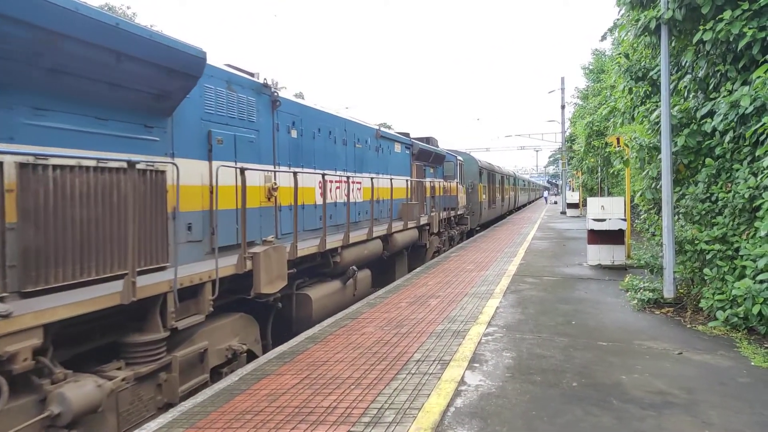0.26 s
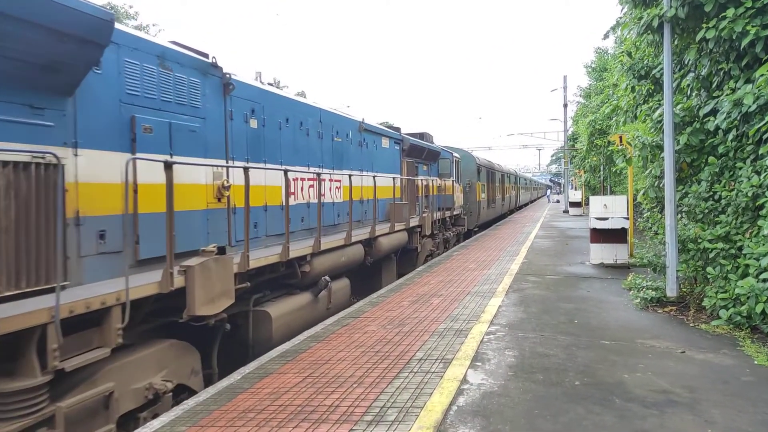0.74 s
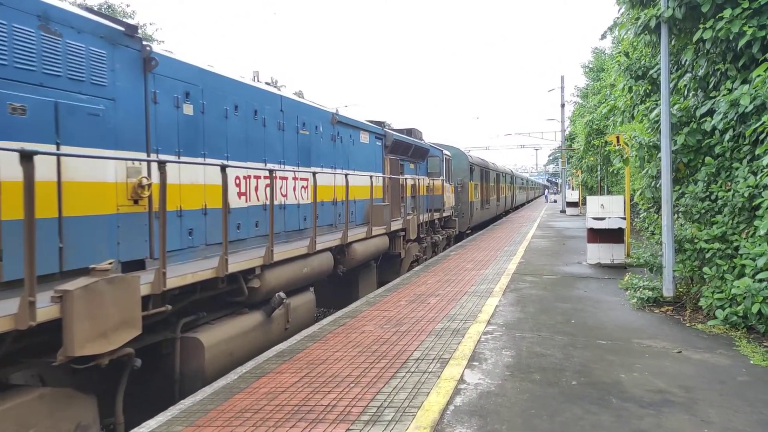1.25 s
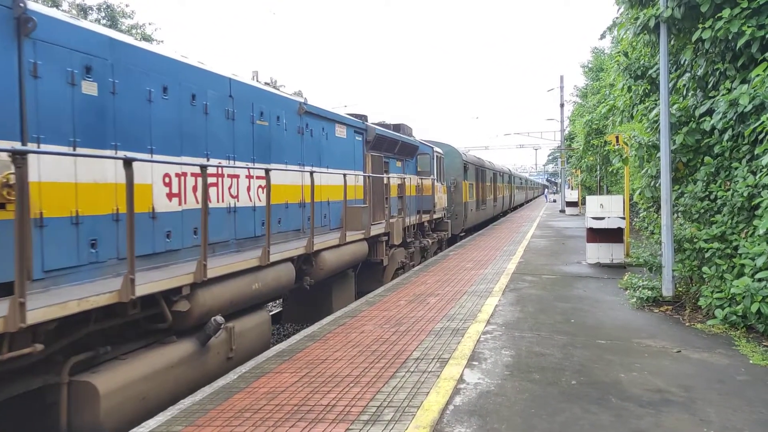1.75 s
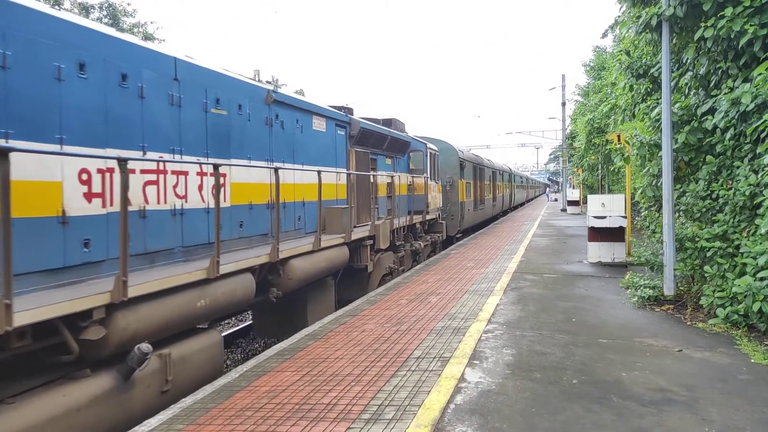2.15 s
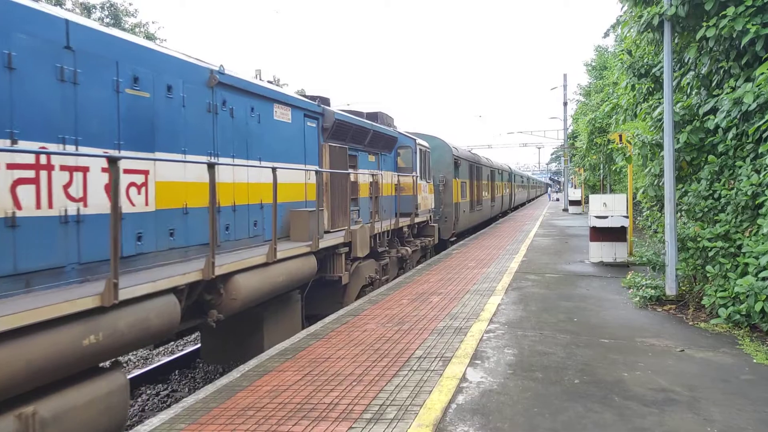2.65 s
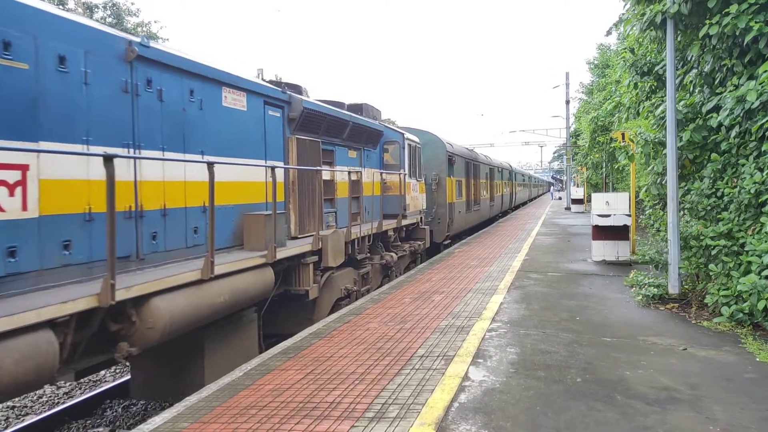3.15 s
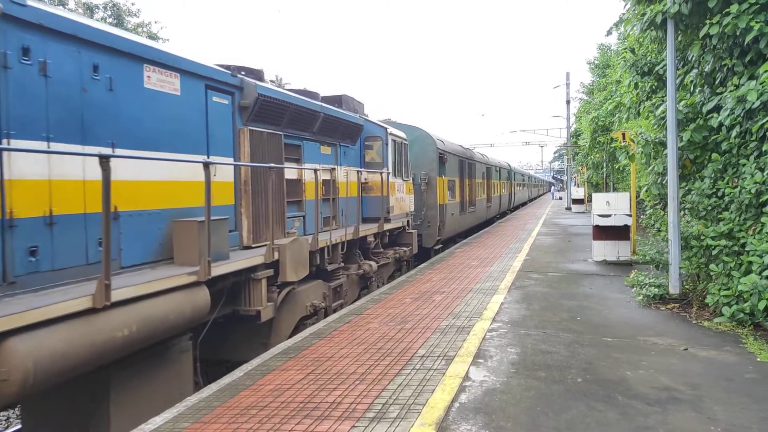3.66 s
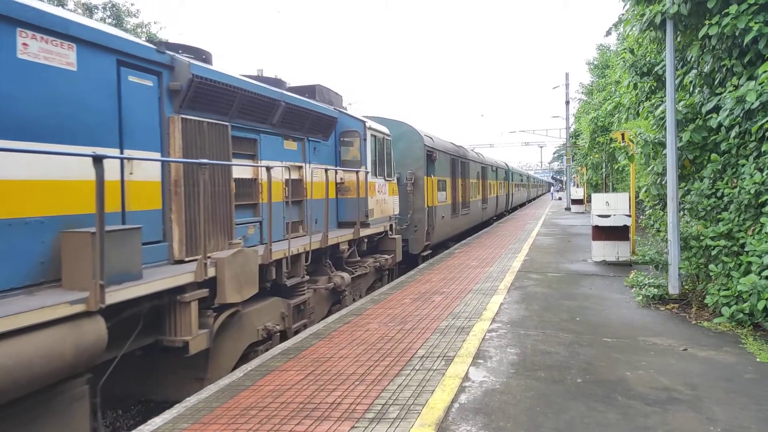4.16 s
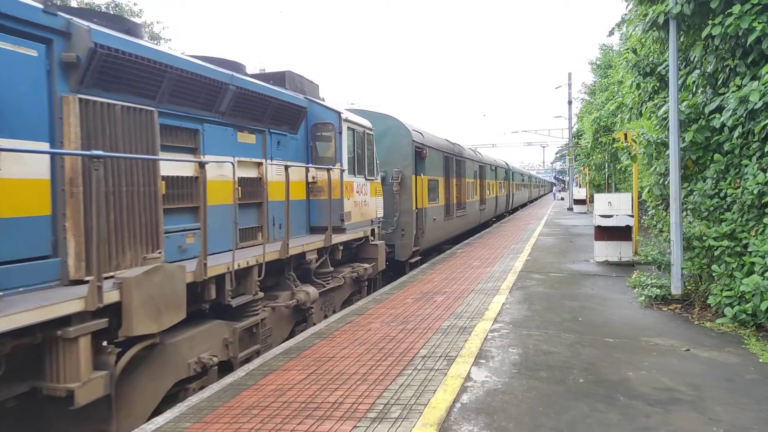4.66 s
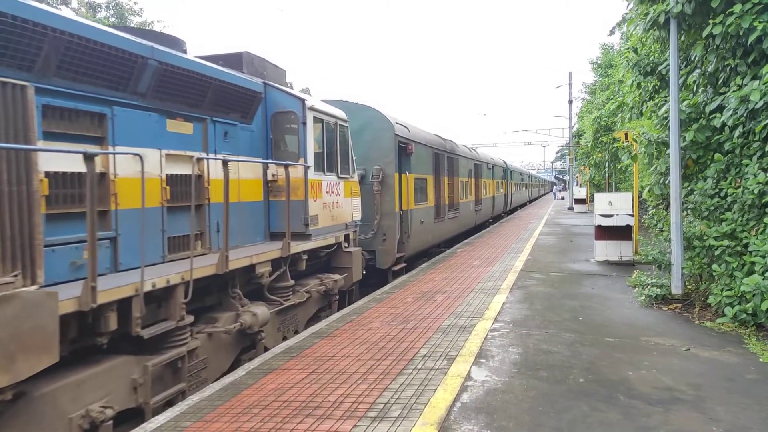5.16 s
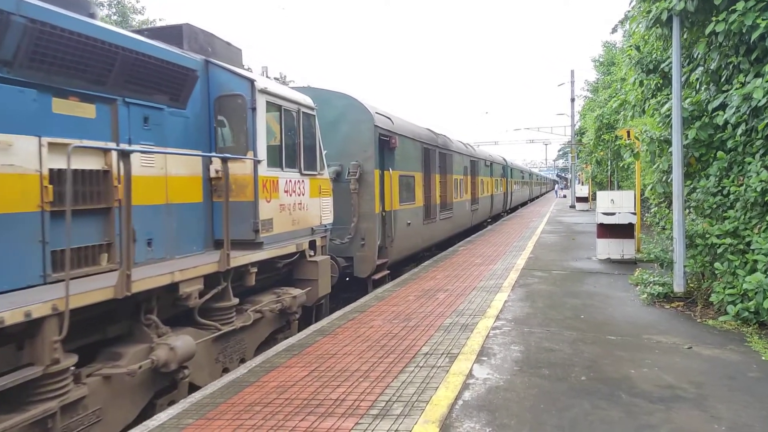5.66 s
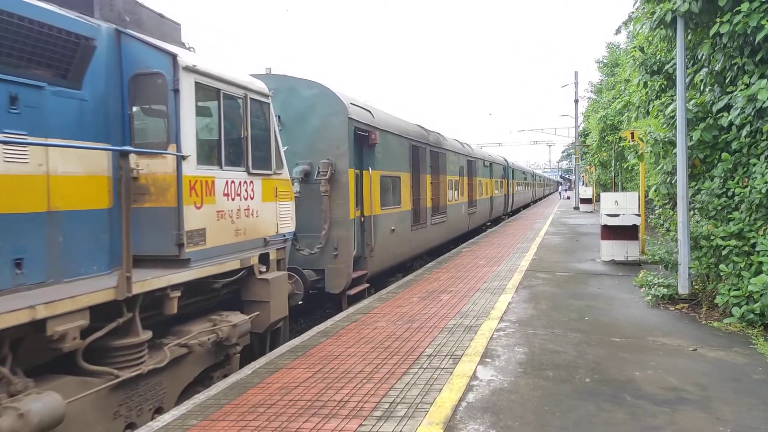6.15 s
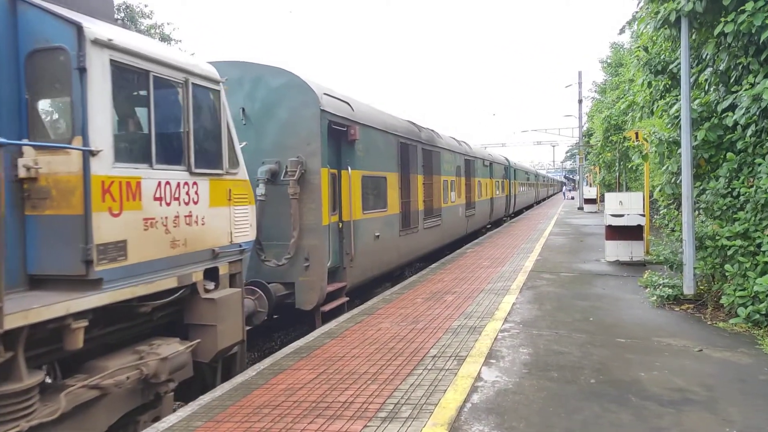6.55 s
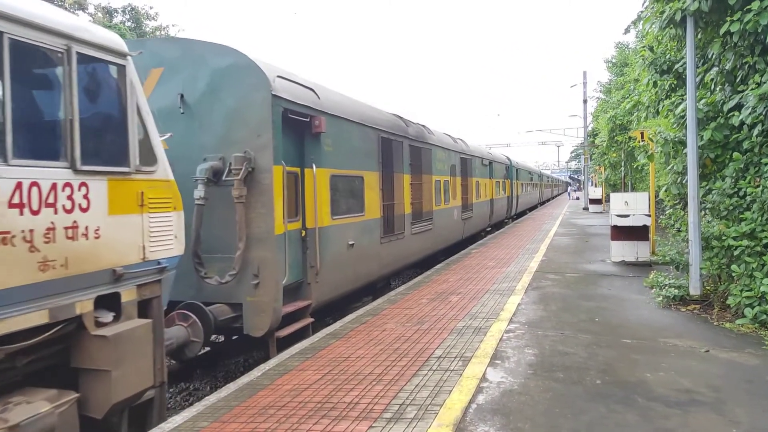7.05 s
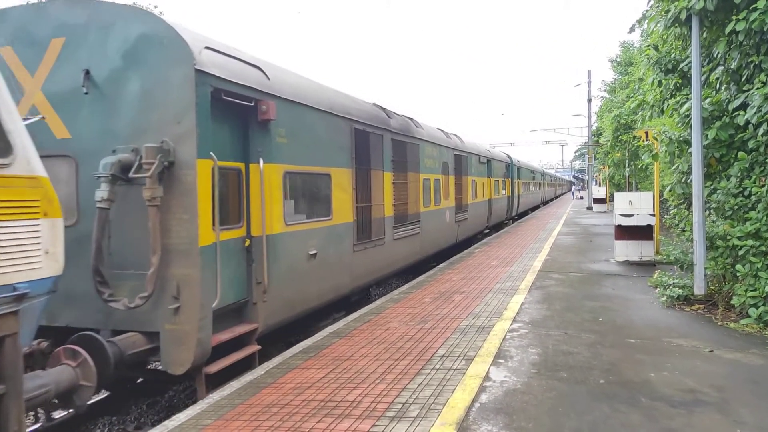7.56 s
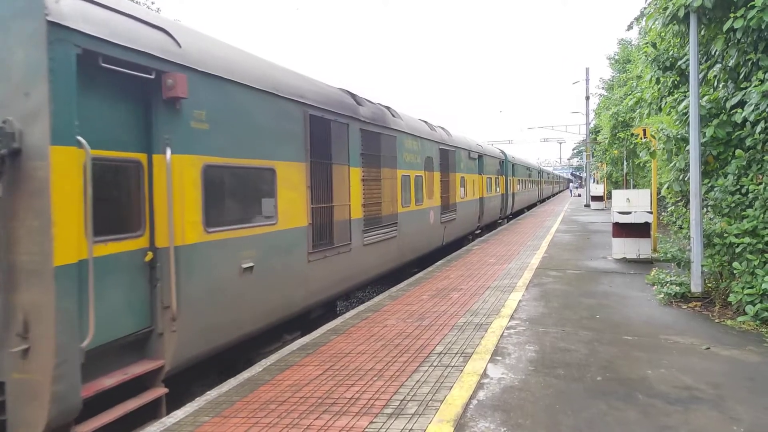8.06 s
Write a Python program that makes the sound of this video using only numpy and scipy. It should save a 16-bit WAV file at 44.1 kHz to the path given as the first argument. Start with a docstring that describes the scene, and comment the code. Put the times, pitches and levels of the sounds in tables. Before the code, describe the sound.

A diesel locomotive rolls slowly past a stereo microphone an arm's length away on an open platform. From 0 to about 1.3 s the engine revs up, its throbbing exhaust drone, gear whine near 4 kHz and airy turbo whistle near 6 to 7 kHz rising together. Then everything glides down, settling near idle by 7 s. Low rumble and a rough mid roar pulse with the firing, swelling around 2 s and again near 6 s; fan noise rushes broadly between. Body panels hum briefly around 1, 2.5 and 4.3 s. Two tiny metallic squeaks come at about 3.6 s, over a faint air sizzle. Intake hiss and whistle flare at 5.3 s. Near 6.2 s the whine bursts out clearer, air spits softly, then the deep boom drops away. Whine flutters throughout and continues to the end at 8.3 s; the left side is duller.

```python
"""Diesel locomotive rolling past a platform

A two-stroke diesel locomotive rolls slowly past, an arm's length from the stereo microphone.
It revs up for about a second, then sinks towards idle; exhaust orders, gear whine and turbocharger whistle
are tones locked to the crankshaft, and gains follow the distance of passing sources.
Running gear, engine roar, fans and intake are shaped noise; body panels drone, metal squeaks and air spits.
The left port lags and is shaded in the treble."""
import sys
import numpy as np
from scipy import signal
from scipy.fft import rfft, irfft, next_fast_len
from scipy.io import wavfile

SR = 44100
rng = np.random.default_rng(int(sys.argv[2]) if len(sys.argv) > 2 else 0)


def dump(signal):
    """Clip the signal to [-1, 1] and save it as 16-bit WAV at the path in sys.argv[1]."""
    limited = np.clip(np.atleast_2d(signal).T, -1, 1)
    pcm = np.round(limited * 32767).astype(np.int16)
    wavfile.write(sys.argv[1], SR, pcm)


N = 366471
TIME = np.arange(N) / SR  # s

# crankshaft speed: t/s, speed/turns per second
CRANK = [(0.0, 6.916), (0.36, 7.363), (1.01, 8.076), (1.3, 8.122), (2.09, 7.867), (2.35, 7.814),
         (3.95, 7.013), (4.41, 6.755), (5.21, 6.486), (6.03, 6.093), (6.52, 5.935), (7.05, 5.84),
         (7.38, 5.8), (8.31, 5.765)]
CRUISE_TURNS_PER_S = 7  # reference for levels that follow the revs
INTAKE_S = 5.3  # the air intake is alongside
# lines of the auxiliary machines, as multiples of the crank rate
FAN_A, FAN_B, PUMP, BLOWER, IDLER_A, IDLER_B = 88, 112, 158, 225, 475, 485


def exhaust(turns):
    """Unequal cylinders put lines on multiples of the crank rate; other crank-locked lines swell among them."""
    uneven = 1 + 0.087 * flutter(width_hz=51).real
    return uneven * (exhaust_boom(turns) + exhaust_drone(turns) + line_blooms(turns))


def crank_line(k, turns):
    """One multiple of the crank rate; its phase drifts."""
    # the two chugs of a turn, which set the phase only: place/turns, weight/dB
    chug_places = [(.76, -2.5), (.15, -1)]
    chugs = sum(undb(db) * np.exp(-2j * np.pi * k * place) for place, db in chug_places)
    drift_cycles = .06 * flutter(width_hz=1.5).real  # shifting paths
    return tone(k * turns + drift_cycles, chugs / np.abs(chugs))


def exhaust_boom(turns):
    """Low exhaust orders recede with distance and are cut off once the cab has come between."""
    # multiple of the crank rate, relative level/dB
    boom_orders = [(8, -2.5), (9, -6.5), (11, -10), (12, -6.5), (13, -8.5), (14, -18.5), (16, -12.5),
                   (17, -10.5)]
    # level/dB before distance and screening, nearest t/s, time to fall 3 dB/s, slope/dB per doubling of revs
    boom_pass = (-24, -8.5, 13.5, 0)
    boom = sum(undb(db) * crank_line(k, turns) for k, db in boom_orders)
    cab_db = -24 * arrival(at_s=6.56, edge_s=1)
    return boom * passing(*boom_pass) * undb(cab_db)


def exhaust_drone(turns):
    """Orders that fall into step once a turn, so the drone lopes; it carries fore and aft, screened by the hood."""
    # multiple of the crank rate, relative level/dB
    drone_orders = [(13, -8), (14, -9), (15, 6), (16, -4), (19, -13), (26, -8)]
    crest_turns = .55  # place of the crest in the turn
    drone = sum(undb(db) * tone(k * (turns - crest_turns)) for k, db in drone_orders)
    hood_db = -23.5 * swell(start=0.031, end=6.46, edge=1.16)
    rev_db = 18 * revs()  # 18 dB per doubling of revs
    return drone * undb(-20 + rev_db + hood_db)


def line_blooms(turns):
    """Single crank-locked lines swell and sink: low exhaust orders, plus falling hums near 500-600 Hz."""
    # start t/s, end t/s, multiple of the crank rate, peak level/dB
    bloom_times = [(0.4, 1.28, 13, -19.5), (0.23, 1.3, 8, -25.5), (0.6, 2.22, 11, -19),
                   (0.73, 1.9, 17, -23), (1.1, 4.2, 10, -30), (.3, 4.3, 9, -28.5), (-1.6, 5.3, 14, -33.5),
                   (0.86, 2.1, 16, -29), (1.2, 2.13, 19, -28.5), (1, 2.5, 29, -32), (2.5, 5.6, 12, -27.5),
                   (3, 5.2, 11, -28.5), (3, 3.12, 79, -26.5), (4, 4.18, 73, -27), (3.8, 5.3, 74, -33.5),
                   (5, 6.45, 17, -28.5), (5, 6.2, 18, -31), (6.5, 9, 17, -22.5)]
    blooms = 0
    for start, end, k, db in bloom_times:
        blooms = blooms + undb(db) * swell(start, end, (end - start) / 2) * crank_line(k, turns)
    return blooms


def gears(turns):
    """The timing gears whine at their mesh rate; reflections off body and platform make it fade and flutter."""
    # level/dB before distance and screening, nearest t/s, time to fall 3 dB/s, slope/dB per doubling of revs
    gear_pass = (-23.5, 7, 1.5, 19.5)
    # the whine is beamed towards the cab end: t/s, level/dB
    gear_beam = [(0, -2), (1, -1.5), (2, 2.5), (6.8, -1), (8.3, -2.5)]
    mesh_order, left_lag_cycles = 568, 0.38

    # the hood screens the gears; open grilles free them partly, the cab front passing frees them wholly
    exposed = arrival(at_s=4.72, edge_s=0.37)
    screen_db = -7.5 * (1 - exposed) - 3.5 * (1 - arrival(at_s=6.13, edge_s=0.13))
    flare_db = 5 * nearness(nearest_s=6.25, span_s=0.15) ** 2  # as they first come free
    beam_db, = curves(gear_beam)
    shimmer_db = (2.5 - 1.8 * exposed) * flutter(width_hz=34).real
    dips_db = -4 * np.maximum(flutter(width_hz=28).real - .2, 0) ** 2
    level = undb(screen_db + flare_db + beam_db + shimmer_db + dips_db)
    gain = passing(*gear_pass) * level * platform_fading()

    backlash_cycles = .095 * flutter(width_hz=45).real
    mesh = mesh_order * turns + backlash_cycles - np.array([[left_lag_cycles], [0]])
    blurred = unit(1 + .38 * spread(width_hz=36, apart=1.5) + .2 * spread(width_hz=100, apart=1.2))
    whine = tone(mesh, blurred)
    # the octave comes out stronger once the open grilles are alongside
    octave = undb(-30.0 + 12.6 * exposed) * tone(2 * mesh, spread(width_hz=13, apart=0.75))
    return gain * (whine + octave)


def platform_fading():
    """The platform echo partly cancels the whine each time the path grows by a wavelength."""
    # moments of cancellation: t/s
    null_times = [-.1, .2, .55, .85, 1.22, 1.5, 2.15, 2.45, 2.82, 3.08, 3.4, 3.74, 4.2, 4.62, 5.02, 5.28,
                  5.58, 5.8, 6.1, 6.39, 6.62, 6.9, 7.27, 7.56, 7.92, 8.4]
    wavelengths = np.interp(TIME, null_times, np.arange(len(null_times)))
    port_share = np.array([[.45], [.95]])  # the right port faces the platform
    echo = undb(-4.5) * port_share * (1 - .5 * arrival(at_s=7.1, edge_s=0.5))  # halves late in the pass
    return np.abs(1 - echo * np.exp(2j * np.pi * wavelengths))


def turbo(turns):
    """The gear-driven compressor whistles at its blade rate, blurred by turbulence that grows with speed."""
    # level/dB before distance and intake flare, nearest t/s, time to fall 3 dB/s, slope/dB per doubling of revs
    turbo_pass = (-26.5, 3.5, 2, 14.5)
    blade_order, overtone_order = 883.5, 1430  # multiples of the crank rate
    speed, = curves(CRANK)
    blades = blade_order * turns
    blur = (speed / np.max(speed)) ** 4
    core = unit(np.exp(1.5j * flutter(width_hz=40).real) + .9 * spread(width_hz=90, apart=.8))
    skirt = spread(width_hz=500, apart=0.75)
    whistle = tone(blades, core * (1.2 - 0.37 * blur) + (0.23 + .5 * blur) * skirt)
    octave_blur = (1 - blur) * spread(width_hz=170, apart=2) + blur * spread(width_hz=520, apart=2)
    octave = undb(-22.5 - 5.5 * blur) * tone(2 * blades, octave_blur)
    third = undb(-25) * tone(3 * blades, spread(width_hz=300, apart=1.5))
    overtone = undb(-35) * tone(overtone_order * turns, spread(width_hz=520, apart=2))
    overtone = overtone * (1 - arrival(at_s=2.4, edge_s=4))
    return passing(*turbo_pass) * intake() * (whistle + octave + third + overtone)


def flow(turns):
    """Four bands of noise: rumble and roar bark once a turn; fan rush and intake hiss churn."""
    firings = 16  # per turn
    puffs = 1 + 0.078 * tone(firings * turns) + 0.036 * tone(turns)
    gust = undb(.5 * flutter(width_hz=20).real)
    air = churn(fan_rush(puffs) + intake_hiss(gust), depth_db=1.3, width_hz=30)
    return bark(turns) * (running_gear() + engine_roar(puffs, gust)) + air


def bark(turns):
    """One cylinder barks once a turn: the gain jumps, then decays exponentially."""
    place_turns, decay_turns = 0.64, 0.13
    added_gain = 0.17 * undb(20 * revs())  # 20 dB per doubling of revs
    return 1 + added_gain * np.exp(-((turns - place_turns) % 1) / decay_turns)


def engine_roar(puffs, gust):
    """The roar escapes under the frame, throbs with the firings and swells as each bogie passes."""
    # f/Hz, relative level/dB
    roar_spectrum = [(250, -26), (430, -2.5), (560, -3), (660, 2.5), (740, 1), (850, -4), (1050, -16.5),
                     (1800, -63)]
    # each bogie: level/dB when nearest, nearest t/s, time to fall 3 dB/s, slope/dB per doubling of revs
    roar_passes = [(-28.5, 1.77, 1.5, 9.5), (-25.5, 5.87, 1.44, 0)]
    gain = np.sqrt(sum(passing(*row) ** 2 for row in roar_passes))
    flicker = undb(.9 * flutter(width_hz=70).real)
    return gain * gust * flicker * lumps() * air_noise(roar_spectrum) * puffs


def lumps():
    """Brief swells of the roar's noise, gone within a few hundredths of a second."""
    # t/s, added gain at the peak
    lump_times = [(.096, .7), (.517, 1.1), (1.873, 1.0), (1.998, 1.3), (2.3, 0.7), (4.89, 1.1),
                  (5.926, 0.7), (7.29, 1.0)]
    rise_s = 0.006
    gain = 1
    for s, added in lump_times:
        age = np.maximum(TIME - s, 0) / rise_s
        gain = gain + added * age * np.exp(1 - age)
    return gain


def running_gear():
    """Wheels and running gear rumble as low noise that recedes down the track."""
    # f/Hz, relative level/dB
    rumble_spectrum = [(15, -18.5), (36, -8.5), (55, -2), (110, 2.5), (170, 2), (240, 0.5), (330, -2.5),
                       (430, -6.5), (600, -19.5), (1200, -76)]
    # level/dB before distance, nearest t/s, time to fall 3 dB/s, slope/dB per doubling of revs
    rumble_pass = (-23.5, -1.5, 9.5, -4)
    waver = undb(0.32 * flutter(width_hz=18).real)
    return passing(*rumble_pass) * waver * air_noise(rumble_spectrum)


def fan_rush(puffs):
    """Fans rush as mid-band noise that throbs with the firings and surges briefly."""
    # f/Hz, relative level/dB
    fan_spectrum = [(600, 1.5), (1000, 4), (1400, 0), (2000, 0), (2600, -4), (3300, -5.5), (3600, -9.5),
                    (3950, -19.5), (6000, -48)]
    # level/dB before distance and surges, nearest t/s, time to fall 3 dB/s, slope/dB per doubling of revs
    fan_pass = (-27, 4.5, 3.5, 6.5)
    # surges: centre t/s, length/s, added level/dB
    surge_times = [(2.05, 0.37, 1), (2.302, 0.081, 2), (4.95, 0.31, 2), (6.078, 0.22, 1.5)]
    surge_db = sum(db * pulse(s, length) for s, length, db in surge_times)
    waver = undb(0.54 * flutter(width_hz=13.7).real)
    return undb(surge_db) * passing(*fan_pass) * waver * air_noise(fan_spectrum) * puffs


def intake_hiss(gust):
    """Drawn-in air hisses, flares as the intake passes and dies as it turns away."""
    # f/Hz, relative level/dB
    hiss_spectrum = [(3000, -19), (3950, -5.5), (4450, 1.5), (5200, 1), (6600, 7), (7300, 2), (8100, -12.5),
                     (9200, -37), (10000, -28), (12000, -31)]
    # level/dB before distance and intake flare, nearest t/s, time to fall 3 dB/s, slope/dB per doubling of revs
    hiss_pass = (-35, 2.5, 4.5, -6)
    fade_db = -3 * np.maximum(TIME - INTAKE_S, 0)  # 3 dB per second
    return passing(*hiss_pass) * intake() * undb(fade_db) * gust * air_noise(hiss_spectrum)


def auxiliaries(turns):
    """Lesser gears, pumps and blowers swell as they pass and fade at random; higher lines are smeared more."""
    # some sound through several openings:
    # multiple of the crank rate, level/dB when nearest, nearest t/s, time to fall 3 dB/s
    machine_lines = [(FAN_A, -27, 1.64, .5), (FAN_B, -31.5, .53, 0.29), (FAN_B, -33, 5.7, 0.25),
                     (PUMP, -34, 2.05, .3), (PUMP, -33.5, 6, 1.1), (BLOWER, -37, .9, .2),
                     (BLOWER, -34.5, 3, 0.55), (2 * PUMP, -35.5, 4.87, 0.47), (IDLER_A, -37, 2.16, 0.37),
                     (IDLER_A, -41, 5.4, 0.77), (IDLER_B, -39, 0.71, 1), (IDLER_B, -38, 5.4, 1.3)]
    out = 0
    for k, db, nearest_s, span_s in machine_lines:
        fading = undb(1.3 * flutter(width_hz=6.5).real)
        waver = unit((1 + spread(width_hz=18 + 0.039 * k, apart=2.1)) * fading)
        out = out + undb(db) * nearness(nearest_s, span_s) * tone(k * turns, waver)
    return out


def panels():
    """Fixed resonances drone under the shaking and now and then sing out."""
    # body panels and the gap under the platform: f/Hz, width/Hz, level/dB
    panel_modes = [(151.6, 2.9, -37), (203.7, 4.9, -34.5), (243.6, 9.4, -35), (337.7, 7.1, -43),
                   (469, 37.6, -37), (656, 9.8, -39), (725, 15, -35.5)]
    # a panel sings out: start t/s, end t/s, f/Hz, level/dB
    hum_times = [(0.859, 1.39, 329.3, -27.5), (2.09, 2.77, 459, -25.5), (2.28, 2.79, 728, -28),
                 (4.16, 4.5, 454.4, -28), (3.1, 8.4, 150.3, -29.5), (5.89, 6.21, 248, -28),
                 (7.343, 7.798, 247.5, -29)]
    drone = sum(undb(db) * tone(hz * TIME, spread(width, apart=0.16)) for hz, width, db in panel_modes)
    hums = 0
    for start, end, hz, db in hum_times:
        waver = 1 + 0.05 * flutter(width_hz=22.0)
        hums = hums + undb(db) * swell(start, end, edge=0.083) * tone(hz * TIME, waver)
    return drone + hums


def undercarriage():
    """Metal squeaks as short, roughened tones; compressed air sizzles and spits from a valve as noise."""
    # squeaks: centre t/s, length/s, f/Hz, level/dB
    squeak_times = [(.2, .06, 7020, -37), (3.55, .06, 6880, -32), (3.68, .06, 6830, -32)]
    # air spits: centre t/s, length/s, level/dB
    spit_times = [(2.31, .08, -50), (6.07, .18, -43)]
    # spit and sizzle spectra: f/Hz, relative level/dB
    spit_spectrum = [(2500, -1), (6500, 2), (8500, 8), (11000, -4), (15500, -14)]
    sizzle_spectrum = [(6000, -14.5), (8000, 4.5), (8350, 14.5), (8520, -1), (8700, 15.5), (8950, 2),
                       (9200, 11), (9600, 3.5), (12000, 0.5), (15500, 0)]
    # leak: level/dB before distance, nearest t/s, time for plain distance to fall 3 dB/s, slope/dB per doubling of revs
    leak_pass = (-49.5, 4, 3, -17)
    squeaks = 0
    for s, length, hz, db in squeak_times:
        rough = 1 + 1.9 * flutter(width_hz=120)
        squeaks = squeaks + undb(db) * pulse(s, length) * tone(hz * TIME, rough)
    spits = sum(undb(db) * pulse(s, length) for s, length, db in spit_times) * air_noise(spit_spectrum)
    # beamed sideways, the leak falls off 4.1 times as many dB as distance alone
    leak = passing(*leak_pass, beam=4.1) * air_noise(sizzle_spectrum)
    sputter = undb(1.5 * flutter(width_hz=45).real)
    return squeaks + sputter * (spits + leak)


def intake():
    """Extra gain while the air intake is alongside."""
    return undb(5 * nearness(INTAKE_S, span_s=0.2) ** 2)


def revs():
    """Crank speed in doublings above cruising revs."""
    speed, = curves(CRANK)
    return np.log2(speed / CRUISE_TURNS_PER_S)


def nearness(nearest_s, span_s):
    """Inverse distance of something that rolls by: 1 when nearest, 3 dB down a span away."""
    return 1 / np.hypot(1, (TIME - nearest_s) / span_s)


def passing(db, nearest_s, span_s, rev_db=0, beam=1):
    """Gain of a source that rolls by and changes by rev_db per doubling of revs."""
    return undb(db + rev_db * revs()) * nearness(nearest_s, span_s) ** beam


def swell(start, end, edge):
    """A smooth rise and fall between two times."""
    ramp = np.clip(np.minimum(TIME - start, end - TIME) / edge, 0, 1)
    return np.sin(np.pi / 2 * ramp) ** 2


def pulse(centre_s, length_s):
    """A short swell centred on a time."""
    return swell(centre_s - length_s / 2, centre_s + length_s / 2, length_s / 2)


def arrival(at_s, edge_s):
    """A smooth step from 0 to 1 centred on a time."""
    return swell(at_s - edge_s / 2, np.inf, edge_s)


def tone(cycles, amplitude=1):
    """A line that follows a phase given in cycles."""
    return np.real(amplitude * np.exp(2j * np.pi * cycles))


def flutter(width_hz):
    """Complex random amplitude of rms 1 that spreads a line over a width."""
    step = 16  # drawn at a lower rate, then interpolated
    z = rng.standard_normal((N // step + 1, 2)) @ np.array([1, 1j])
    cutoff_hz = min(width_hz / 2, SR / step / 3)
    z = signal.sosfilt(signal.butter(3, cutoff_hz, fs=SR / step, output="sos"), z)
    return unit(np.interp(np.arange(N), np.arange(len(z)) * step, z))


def spread(width_hz, apart):
    """A flutter for each port, partly shared."""
    own = np.array([flutter(width_hz), flutter(width_hz)])
    return unit(flutter(width_hz) + apart * own)


def air_noise(points):
    """Stereo noise of rms 1: a direct part common to both ports plus unrelated reflections."""
    # share of reflected sound: f/Hz, level/dB
    reflected_share = [(50, -23.5), (125, -26.5), (250, -18.5), (500, -6), (1000, -2.5), (2000, -0.5),
                       (4000, 0), (10000, -1.5)]
    share = np.clip(response(reflected_share), 0, 1)
    spectrum = response(points)
    direct = colour(rng.standard_normal(N), spectrum * np.sqrt(1 - share ** 2))
    reflected = colour(rng.standard_normal((2, N)), spectrum * share)
    return unit(direct + reflected)


def churn(x, depth_db, width_hz):
    """Turbulence: each half octave from 1 to 8 kHz swells and sinks on its own."""
    bins = np.fft.rfftfreq(next_fast_len(N), 1 / SR)
    octaves = np.log2(np.clip(bins, 1000, 8000) / 1000)  # the end bands take in all beyond
    out = 0
    for band in range(7):
        window = np.maximum(1 - np.abs(2 * octaves - band), 0)
        out = out + colour(x, window) * undb(depth_db * flutter(width_hz).real)
    return out


def response(points):
    """Gain of a (f/Hz, level/dB) spectrum at each frequency bin."""
    hz, db = np.transpose(points)
    bins = np.fft.rfftfreq(next_fast_len(N), 1 / SR)
    return undb(np.interp(np.log(bins + 1), np.log(hz), db))


def colour(x, gain):
    """Filter with a gain per frequency bin."""
    size = next_fast_len(N)
    return irfft(rfft(x, size) * gain, size)[..., :N]


def curves(table):
    """Each column of a table after the time as a value per sample."""
    s, *columns = np.transpose(table)
    return [np.interp(TIME, s, c) for c in columns]


def unit(x):
    """Scale to rms 1."""
    return x / np.sqrt(np.mean(np.abs(x) ** 2))


def undb(db):
    """Decibels to gain."""
    return 10 ** (np.asarray(db) / 20)


def scene():
    """All sources; those of the engine are locked to one crankshaft."""
    speed, = curves(CRANK)
    turns = np.cumsum(speed) / SR
    engine = exhaust(turns) + gears(turns) + turbo(turns) + auxiliaries(turns)
    return engine + flow(turns) + panels() + undercarriage()


def record(dry):
    """At the microphone the left port hears later and duller; both ports are cut at the top."""
    # response of the left port: f/Hz, level/dB
    left_response = [(60, 1), (300, -0.5), (1300, -2), (2500, -1), (3350, -0.5), (3700, -6), (3950, -10.5),
                     (4400, -16), (5200, -16), (6200, -26.5), (7200, -23), (9000, -10.5), (11500, -1.5),
                     (13000, 1), (14500, -5.5)]
    # lag of the left port: t/s, lag/ms
    left_lag = [(0, 0.13), (2.0, 0.2), (2.7, 0.34), (5.2, 0.39), (6, 0.464), (8.3, 0.41)]
    lag_ms, = curves(left_lag)
    left = np.interp(TIME - lag_ms / 1000, TIME, colour(dry[0], response(left_response)))
    top_cut = signal.ellip(10, .2, 70, 15700, fs=SR, output="sos")  # low-pass at 15.7 kHz
    return signal.sosfilt(top_cut, np.array([left, dry[1]]))


dry = scene()
out = record(dry)
dump(out)
```